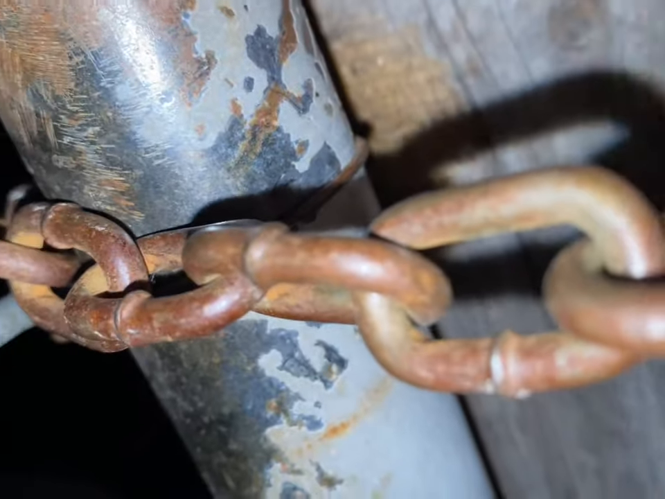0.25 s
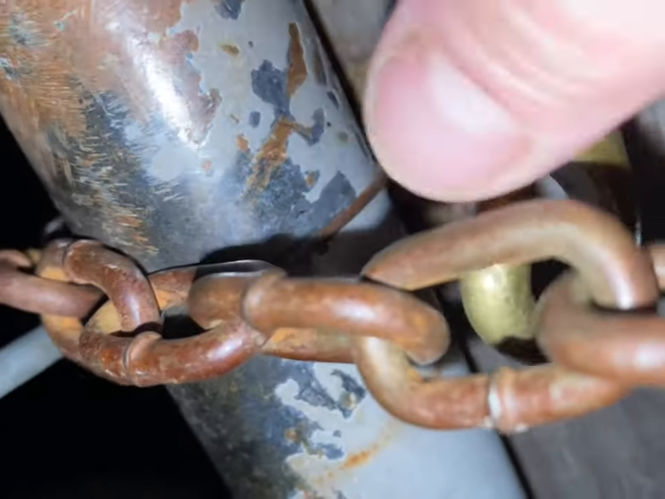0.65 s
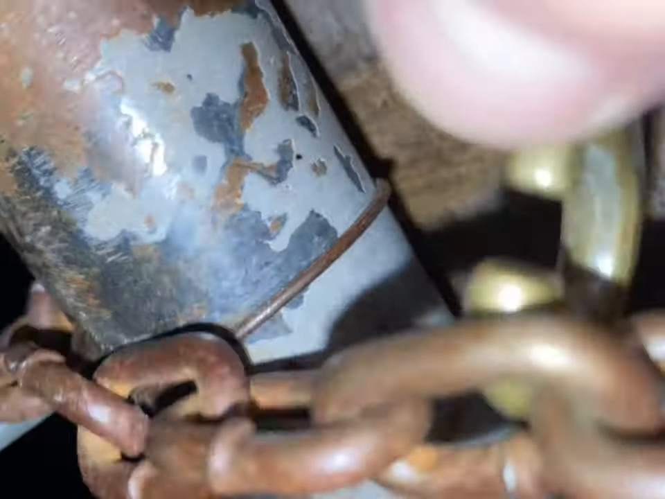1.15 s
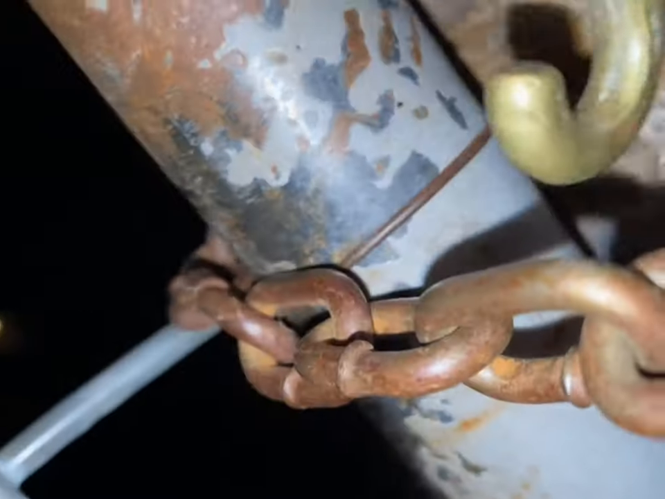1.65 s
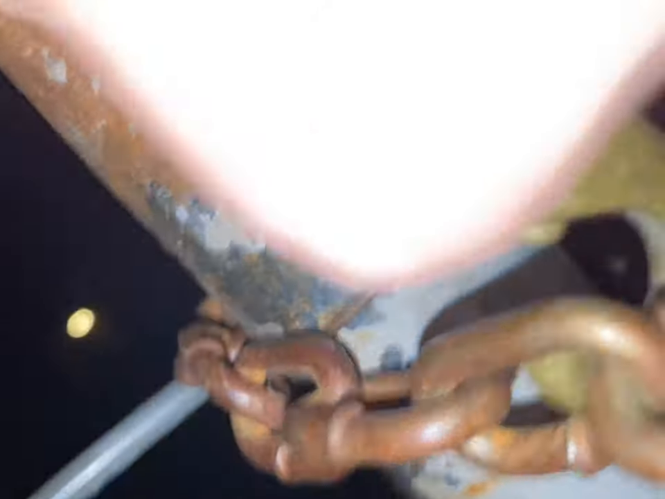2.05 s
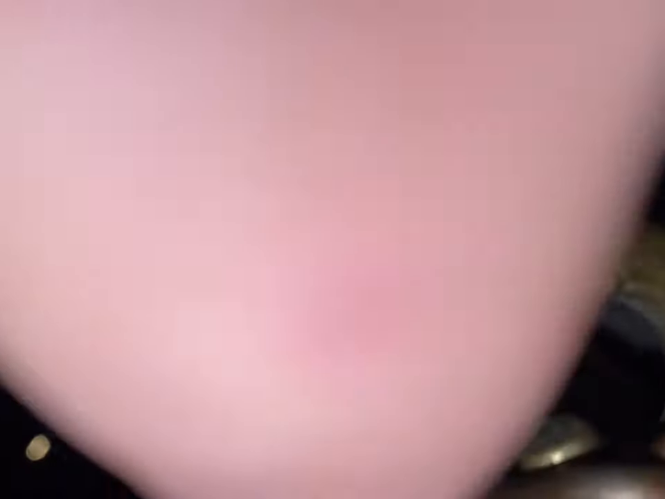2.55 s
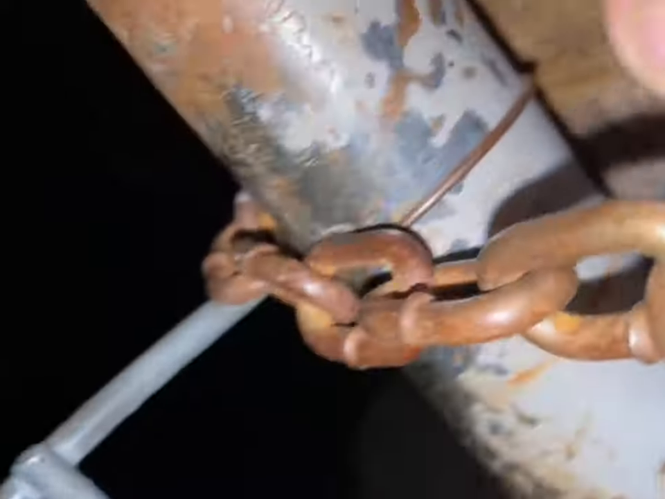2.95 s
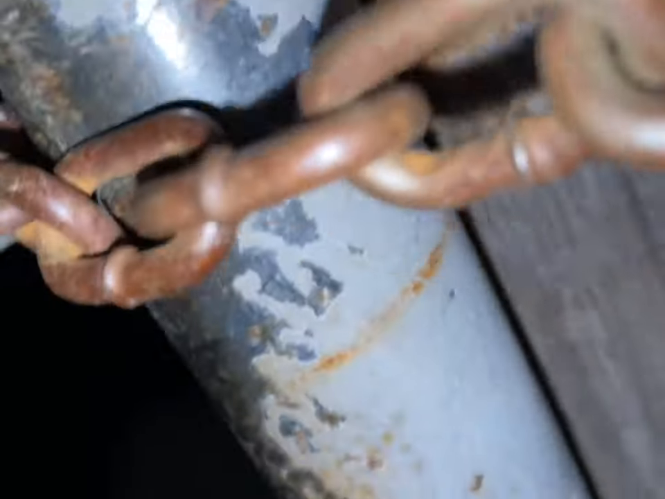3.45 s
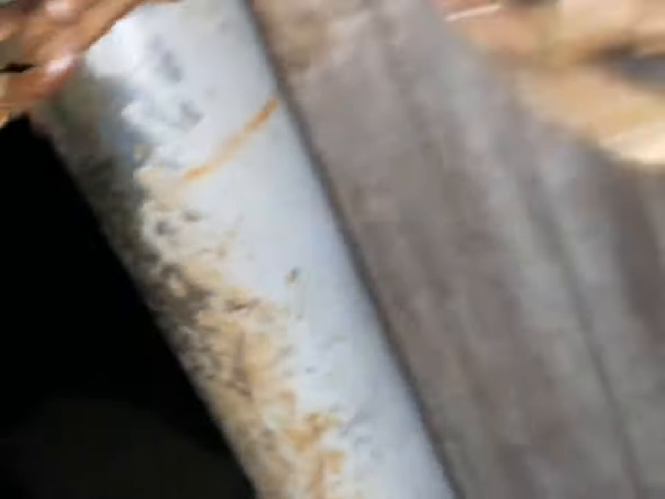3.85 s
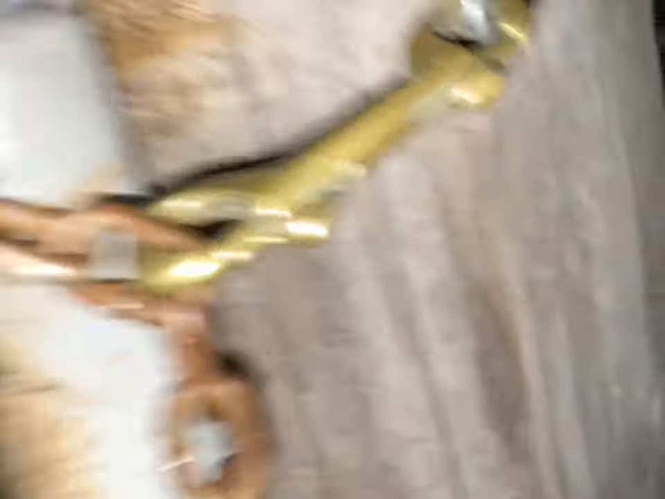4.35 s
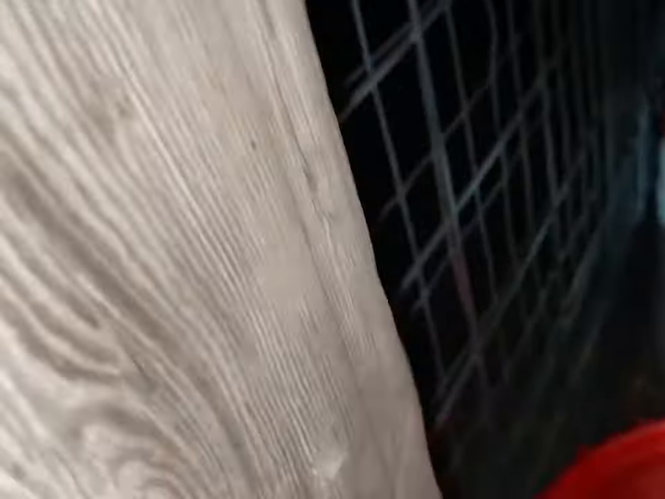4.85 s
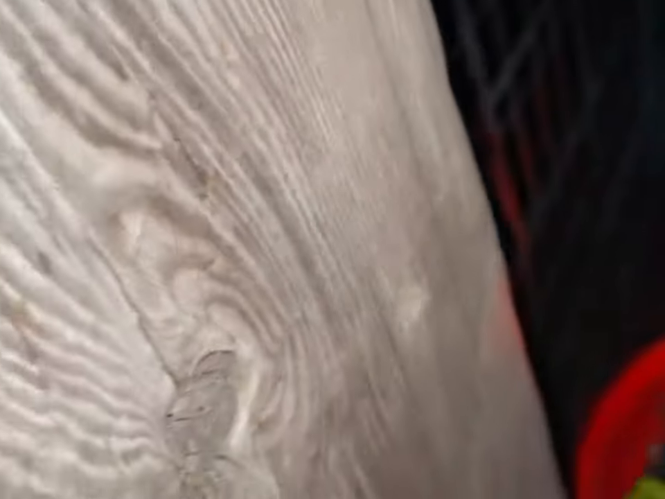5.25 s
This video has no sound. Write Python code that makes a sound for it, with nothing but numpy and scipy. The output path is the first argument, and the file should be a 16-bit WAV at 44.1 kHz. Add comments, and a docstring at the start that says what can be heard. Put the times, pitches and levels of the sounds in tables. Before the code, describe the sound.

A rusty chain clinks and rattles close by as a metal hook is fastened, then a wooden gate briefly scrapes and judders.

```python
"""Rusty chain links clink and drag as a hand works a sprung brass snap hook onto them, close to a phone.
Each impact excites the modes of the links and of the steel pipe post they are wrapped round; the hook's
spring squeaks by stick-slip friction. Then a plank gate scrapes and judders over grit, shaking its mesh.
Behind it a sleeve rustles, the hand rumbles on the phone and a far motor hums in the night air."""
import sys
import numpy as np
from scipy import signal
from scipy.fft import rfft, irfft
from scipy.io import wavfile
from scipy.ndimage import uniform_filter1d

SR = 44100
rng = np.random.default_rng(int(sys.argv[2]) if len(sys.argv) > 2 else 0)


def unload_audio(sound):
    """Save the sound as a 16-bit wav file, at the path given as the first command line argument."""
    columns = np.transpose(np.atleast_2d(sound))
    # keep every value between -1 and 1, then stretch to whole-number steps
    steps = np.round(np.clip(columns, -1, 1) * 32767)
    wavfile.write(sys.argv[1], SR, steps.astype(np.int16))


N = 243035
T = np.arange(N) / SR

# impacts of links and hook: (time [s], tick level [dB], body [dB re tick], post ring [dB re tick],
# thud [dB re tick], body pitch [Hz])
CLINKS = [(0.0167, -68.5, 6, -28, 10, 3960), (.04, -72, 5, -30, -8, 4500), (0.061, -61.5, 5, -20, -6, 3000),
          (.097, -72, 9, -30, -5, 3000), (.222, -78, 8, -30, 3, 4000), (0.268, -42, -12, -34, -40, 2860),
          (.35, -76, 6, -30, 5, 2200), (0.375, -56, -7.5, -21, -26, 2900),
          (0.5126, -71, 20, -18, -10, 3320), (0.5275, -51, -5, -15, -27, 4120),
          (.5444, -55, -2, -26, -26, 4670), (0.5745, -60, 4.5, -30, -25, 3000),
          (0.7158, -40.5, -12.5, -32, -28, 3950), (0.7303, -44.5, -11, -30, -20, 3880),
          (.7505, -56.5, -0.5, -24, -25, 4650), (.8, -70, 6, -30, -15, 4500),
          (0.8606, -52, -12, -33, -27, 4000), (.92, -72, 5, -30, -15, 4600),
          (.945, -48.5, -1, -41, -13, 4080), (1.005, -30, -13, -34, -21.5, 4030),
          (1.0982, -25.5, -16, -31, -25, 3750), (1.1476, -29, -8.5, -26, -46, 4770),
          (1.261, -42.5, 4, 4.5, -2, 3600), (1.2708, -49, -8, -2, -6, 2020),
          (1.2809, -47, -4, 5, -19, 1770), (1.3635, -57, -12, -17, -3, 1940),
          (1.3761, -49.5, -3.5, -28, -19, 3600), (1.396, -68, 9, -30, -15, 4200),
          (1.51, -50, -2, -34, -21, 2920), (1.526, -60, 5, -30, -15, 3100),
          (1.621, -62, -3, -30, -15, 3500), (2.022, -61, 1, -36, 11, 1750),
          (2.0373, -43, -8.5, -30, -19, 3980), (2.0648, -28, -16, -47, -33, 2660),
          (2.2211, -37, -7, -19, -36, 2580), (2.241, -40, -7, -35, -12, 2600),
          (2.2556, -53.5, -23, -14, 7.5, 1910), (2.309, -68.5, -1, 0, 17, 1560),
          (2.345, -70, -3, -20, 9, 1500), (2.41, -72, 3, -20, 11, 1500), (2.59, -66, -9, -30, -25, 4000),
          (2.7126, -66.5, -1, -7, 11, 1920), (2.7332, -71.5, 12.5, 5.5, 12.5, 2370),
          (2.7915, -63, -12, -35, -30, 3000), (2.811, -64, -15, -35, -30, 3000),
          (2.828, -66, -15, -35, -30, 3000), (2.9794, -27, -18, -49, -49, 2250),
          (3.0158, -55, 2, -10, -26, 2570), (3.0359, -25, -14, -29, -39, 2220),
          (3.111, -59, -8, -30, -30, 4000), (3.121, -26.5, -7, -24, -31, 2930),
          (3.1614, -25.5, -11, -36, -38, 3510), (3.1676, -34.5, -1.5, -24, -13.5, 2140),
          (3.291, -45.5, -10, -15, -32, 3700), (3.339, -47, -10, -36, -31, 2200),
          (3.4257, -44, -2, -12, -10, 2990), (3.5774, -43.5, -5, -10, -29.5, 5340),
          (3.5947, -69.5, 15, 8, 7, 3630), (3.703, -68, 2, -15, -5, 3000), (3.7944, -48, -9, -4, -27, 3470),
          (3.8279, -28, -23, -29, -50, 3400), (3.837, -56, 8, -30, -12, 2300),
          (3.8477, -35, -16, -39.5, -37, 3930), (3.8565, -31, -12, -22, -35, 3180),
          (3.888, -29.5, -10, -2.5, -27, 2940), (3.8971, -28, -12, 3, -38, 3200),
          (3.9043, -33, -16, 4, -26, 3830), (3.914, -40, -12, 11, -25, 3300),
          (3.9663, -31, -5, -16, -36, 3450), (3.9755, -20, -20, 2.5, -40.5, 3520),
          (3.9929, -25, -20, 5.5, -13, 3700), (3.996, -34, -5.5, 8, -20, 1490),
          (4.0022, -31.5, -14, 12, -15, 3060), (4.0294, -37, -14, 8, -25, 1400),
          (4.1393, -62, -21, 13.5, 1, 2560), (4.2615, -60, 8, 18, 3, 2600), (4.425, -74, 8, -20, 10, 2000),
          (4.4399, -72, 13, -9, 18, 2520), (4.904, -68, 7, -30, -15, 4700), (4.9364, -62, 14, -7, 3, 2170)]
# bright modes of a rusty link: (frequency [Hz], level [dB], t60 [s])
LINK_MODES = [(6800, -4.5, 0.0067), (10220, -8.5, 0.03), (10220, 20, 0.007), (13500, -20, .008),
              (14800, -7, .008)]
# the chain runs through the hook: (peak time [s], level [dB], 60 dB rise [s], t60 [s])
CHAIN_RUNS = [(1.152, -47.5, .01, .3), (1.27, -56, 0.19, 0.27), (3.166, -49, .018, 0.076),
              (3.863, -49, 0.0735, .4), (3.915, -43, 0.24, 0.052), (3.972, -41, .1, .2),
              (4.0, -35, 0.1137, .055)]
# rattle of the running chain: (frequency [Hz], spectral level [dB])
RUN_SPECTRUM = [(200, -25), (700, -29), (1300, -14), (2000, -14), (3400, -6.5), (5000, -8), (7000, -1),
                (11000, -3), (12500, -11), (14800, -15), (16500, -38.5)]
# sustained contact: (time [s], sleeve rustle [dB], chain drag [dB], hand rumble [dB])
CONTACT_LEVELS = [(0, -90, -80, -72), (.48, -92, -86, -68.5), (.85, -99, -87, -71), (1.05, -82, -74, -70),
                  (1.17, -64, -70, -74), (1.28, -69, -64, -68), (1.37, -86, -65, -63),
                  (1.57, -83, -78, -65.5), (2.0, -101, -86.5, -68), (2.09, -84, -76.5, -70.5),
                  (2.38, -79, -76, -62.5), (2.75, -102, -82.5, -64), (3.0, -79, -84.5, -65.5),
                  (3.19, -65, -63.5, -62), (3.34, -74.5, -73, -72.5), (3.55, -96, -75, -80),
                  (3.84, -73, -77, -77), (3.92, -85, -73, -82), (4.22, -97, -65, -86),
                  (4.73, -95.5, -82, -70.5), (4.86, -72.5, -73.5, -70), (5.02, -78, -67.5, -82),
                  (5.13, -101, -88, -64)]
# rust sliding on steel: (frequency [Hz], spectral level [dB])
DRAG_SPECTRUM = [(290, -34.5), (500, 1.5), (763, -8), (851, 0), (1720, -1), (2720, -0.5), (3300, -0.5),
                 (5420, -4.5), (9000, -15.5), (11700, -32.5), (19800, -120)]
# pulls on the spring: (start [s], end [s], slips [count], first level [dB], last level [dB],
# first pitch [Hz], last pitch [Hz])
SPRING_PULLS = [(1.6473, 1.676, 2, -50, -44, 9100, 9550), (2.8524, 2.9524, 9, -65, -71, 8450, 9550)]
# partials of the coil: (frequency [multiple of the pitch], level [dB])
SPRING_MODES = [(1, 7), (1.27, -9), (1.5, -1.5)]
# modes of the pipe: (frequency [Hz], gain when struck [dB], t60 [s], gain when rubbed [dB])
POST_MODES = [(850, -42, .04, 6), (1255, -32, .05, 3), (1310, -29.5, .07, 7), (2140, -38, .09, 8),
              (2550, -38, .07, 6), (3270, -34, .07, 7), (3550, -32, .08, 8), (3830, -32, .08, 6),
              (4320, -32, .09, 6), (5760, -12, .08, 10), (5820, -6.5, .18, 19), (5950, -13, .1, 12),
              (6160, -11, .08, 12), (6235, -14, .07, 8), (6300, -12, .043, 6), (6751, -32.5, .1, 5),
              (7020, -27, .1, 6), (10000, -29, .1, 4)]
# the chain settles on the post and mutes it: (start [s], ramp [s], release [s], gain [dB])
POST_MUTES = [(3.93, .04, 3.972, -7), (4.02, .02, 4.13, -4)]
# blows on the gate and post footing: (time [s], level [dB], depth of tone [0-1])
KNOCKS = [(0.956, -52.5, 0.81), (.975, -64, 0.45), (3.872, -55, .95), (3.89, -55, .95), (3.915, -55, .92),
          (3.958, -54, .95), (3.995, -49, 0.55), (5.118, -50, 0.33), (5.139, -27.5, 0.41),
          (5.176, -30, 0.44), (5.203, -29.5, 0), (5.296, -34, 0.64), (5.308, -29.5, 0.88),
          (5.328, -32.5, 0.74), (5.347, -38, .75)]
# modes of the planks: (frequency [Hz], level [dB], t60 [s], depth of tone that excites it best [0-1])
PLANK_MODES = [(165, 5.5, 0.072, 0.94), (218, -3.5, 0.23, 0.52), (280, -0.5, 0.14, 0.8),
               (328, -7, 0.066, 0.94), (422.5, 4.5, 0.26, 0.4), (578, -4, 0.051, 0.5),
               (635, -4.5, 0.051, 0.6), (753, 1.5, 0.14, 0.06), (875, -1.5, 0.07, 0.2)]
# the ground grips the planks and mutes them: (start [s], ramp [s], release [s], gain [dB])
PLANK_MUTES = [(.99, .03, 1.5, -25), (3.93, .02, 3.955, -15), (4.005, .03, 4.6, -29.5),
               (5.2, 0.033, 5.293, -12.5), (5.36, .1, 5.4, -21)]
# shoves that drag the gate: (time [s], jolt level [dB], scrape level [dB], scrape t60 [s])
SHOVES = [(4.939, -65, -56, 1), (5.145, -45, -51, 1), (5.3, -46, -65, 0.28)]
# dull scrape of the gate: (frequency [Hz], spectral level [dB])
SCRAPE_SPECTRUM = [(500, -10.5), (900, -1.5), (1600, -1.5), (2200, -2.5), (3200, -12.5), (5000, -19),
                   (9000, -49)]
# grit crushed under the gate: (peak time [s], level [dB], 60 dB rise [s], t60 [s])
GRINDS = [(4.96, -63, .1, .5), (5.119, -58, .01, .8), (5.143, -41, .012, .4), (5.195, -34.5, .2, .32),
          (5.318, -39, .025, .24)]
# grinding grit: (frequency [Hz], spectral level [dB])
GRIT_SPECTRUM = [(530, -8.5), (900, -10.5), (1880, -30), (2300, -16), (2880, -9), (5120, -10.5), (5580, -6),
                 (7040, -12), (9920, -9), (11500, -6), (11900, -48), (12800, -9.5), (14500, -15),
                 (16800, -64)]
# modes of the gate's wire mesh: (frequency [Hz], nominal width [Hz], level [dB])
MESH_MODES = [(2267, 22, 2), (2960, 40, -3), (3530, 50, -4), (2860, 50, -3), (4680, 50, -5), (5660, 60, -5),
              (10000, 110, -17)]
# the gate comes to rest and its scraping drops: (start [s], ramp [s], release [s], gain [dB])
GATE_HALTS = [(5.075, .025, 5.115, -6), (5.36, .06, 5.6, -18)]
# lone faint rings: (time [s], frequency [Hz], level [dB], t60 [s])
PINGS = [(.09, 568, -61.5, 0.12), (.375, 586, -63, 0.14), (.51, 592, -59.5, 0.094),
         (0.546, 4590, -67.5, 0.33), (.95, 2750, -66, .15), (2.91, 2580, -76, .1)]
# the sleeve brushes past: (time [s], level [dB])
BRUSHES = [(.1, -80), (.36, -78), (.51, -76), (.76, -76), (2.13, -76)]
# sliding cloth: (frequency [Hz], spectral level [dB])
RUSTLE_SPECTRUM = [(3500, -29.5), (6000, -11.5), (8200, -17), (9000, -1), (11200, -0.5), (12200, -15),
                   (13000, -4), (15000, -6), (16300, -41.5)]
# fingers bump the phone: (time [s], level [dB])
BUMPS = [(.87, -59), (.97, -53.5), (1.16, -58.5), (1.28, -54), (2.08, -56.5), (2.27, -54.5), (3.19, -54),
         (3.32, -59), (3.891, -57), (4.65, -61.5)]
# handling noise: (frequency [Hz], spectral level [dB])
RUMBLE_SPECTRUM = [(12, -61.5), (20, -21), (39, -5), (59, 4.5), (87, -4.5), (233, -15), (262, -19),
                   (358, -19.5), (700, -34), (910, -51), (1540, -120)]
# spectral lines of the motor: (frequency [Hz], level [dB])
HUM_LINES = [(58.5, -71), (117, -72), (234, -78.5), (290, -93.5), (357, -78), (409, -83.5)]
# the hum weakens as the phone turns away: (time [s], gain [dB])
HUM_FADE = [(0, -1.5), (3.35, -3.5), (3.5, -12), (4.1, -18), (4.6, -9), (5.51, -1.5)]
# night ambience: (frequency [Hz], spectral level [dB])
NIGHT_SPECTRUM = [(59, -30), (100, -8.5), (302, 0.5), (358, -0.5), (752, -15.5), (1010, -13), (4110, -27),
                  (7140, -43.5), (10200, -27), (15000, -36), (16000, -55)]
# the ambience dies away at the end: (start [s], ramp [s], release [s], gain [dB])
NIGHT_FADE = [(5.42, .07, 5.6, -12)]

TICK_RISE_S, TICK_T60_S, CLINK_PAN_DB = .0005, .013, 1.5  # pan is left minus right
BODY_T60_S, BODY_SPAN, NEIGHBOUR_DB = .016, 1.6, -7  # span is a frequency ratio each way
SLIP_RISE_S, SPRING_T60_S, SPRING_GLIDE_PER_S = .0009, .027, 1.7  # glide is a relative rise in pitch
SLIP_JITTER, SLIP_SCATTER_DB, SLIP_ROUGH_DB = .006, 3, 4
WAKE_DB, WAKE_SPAN_DB = -80, 16  # the drag starts to ring the post here, and does so fully a span higher
RUN_TO_POST_DB, CLINK_TO_WALL_DB, POST_FLUTTER_DB = -.5, -17, 3
PORT_LAG_SAMPLES, NOTCH_HZ, NOTCH_WIDTH_HZ, BASS_CUT_HZ, TOP_HZ = 11, 11800, 650, 44, 16800


def clinks():
    """Impact excitation: a broadband crack rings a link's modes, over a duller body and a thud."""
    size = 8192
    out, t = np.zeros((2, N + size)), np.arange(size) / SR
    peak = lambda x: x / np.abs(x).max()
    fall = lambda stretch: (1 - np.exp(-t / TICK_RISE_S)) ** 2 * undb(-60 * t / (stretch * TICK_T60_S))
    for s, db, body_db, _, thud_db, body_hz in CLINKS:
        crack = stereo_noise(.85, size) * fall(.42)
        crack[1] = np.roll(crack[1], PORT_LAG_SAMPLES)  # reaches the right port late
        link = sum(undb(mode_db + 4 * rng.standard_normal())
                   * ring(crack[0], hz * (1 + .044 * rng.standard_normal()), t60, 1.87)
                   for hz, mode_db, t60 in LINK_MODES)
        tail = band(stereo_noise(0, size) * fall(15), 5000, 16000)  # from rust and wood
        tick = peak(band(crack, 6300, 13500)) + undb(-.8) * peak(link) + undb(-36) * tail
        burst = stereo_noise(0, size) * (fall(2.2) + undb(-17) * fall(7.1))
        # neighbouring links answer at nearby pitches
        pitches_hz = body_hz * np.append(1, 1.25 ** rng.standard_normal(3))
        tones = sum(undb(NEIGHBOUR_DB * (k > 0)) * ring(crack[0], hz, BODY_T60_S, 1.9)
                    for k, hz in enumerate(pitches_hz))
        body = peak(band(burst, body_hz / BODY_SPAN, body_hz * BODY_SPAN)) + undb(4.5) * peak(tones)
        thud = peak(band(stereo_noise(.31, size) * fall(3), 190, 1200))
        i = int(s * SR)
        out[:, i:i + size] += undb(db) * (tick + undb(body_db) * body + undb(thud_db) * thud)
    return out[:, :N] * undb([[CLINK_PAN_DB / 2], [-CLINK_PAN_DB / 2]])


def chain_run():
    """Superposition: dense collisions merge into a rattle as the chain runs through the hook."""
    level = sum(surge(s, db, rise_s, t60) + surge(s, db - 22, rise_s, t60=.66)
                for s, db, rise_s, t60 in CHAIN_RUNS)
    return level * colour(stereo_noise(0) * grains(900, 2.1), RUN_SPECTRUM)


def chain_drag(level_db):
    """Sliding friction: rusty surfaces catch and slip, giving a grainy noise."""
    return undb(level_db + 2 * walk(30)) * colour(stereo_noise(-.068) * grains(440, 2.4), DRAG_SPECTRUM)


def spring():
    """Stick-slip: each of a row of even slips pings the coil, whose pitch climbs as it tightens."""
    size = 4096
    out, t = np.zeros((2, N + size)), np.arange(size) / SR
    slips = np.concatenate([np.linspace([s0, db0, hz0], [s1, db1, hz1], round(count))
                            for s0, s1, count, db0, db1, hz0, hz1 in SPRING_PULLS])
    onset = (1 - np.exp(-t / SLIP_RISE_S)) ** 2
    for s, db, hz in slips:
        pitch_hz = hz * (1 + SLIP_JITTER * rng.standard_normal())
        phase = 2 * np.pi * pitch_hz * (t + SPRING_GLIDE_PER_S * t ** 2 / 2)
        coil = sum(undb(mode_db) * stereo_sine(ratio * phase, 1.36 * ratio)
                   for ratio, mode_db in SPRING_MODES)
        coil *= undb(-60 * t / SPRING_T60_S)
        crack = undb(2) * band(stereo_noise(.26, size), 10000, 12800) * undb(-60 * t / .012)
        i = int(s * SR)
        out[:, i:i + size] += undb(db + SLIP_SCATTER_DB * rng.standard_normal()) * onset * (coil + crack)
    return out[:, :N] * undb(SLIP_ROUGH_DB * walk(500) - 2.5)


def post(rub):
    """Free and forced vibration: the pipe's clustered modes ring after blows and sing while rubbed."""
    s, db, _, ring_db = np.transpose(CLINKS)[:4]
    spread_db = 1.3 * rng.standard_normal((len(s), len(POST_MODES)))
    out = 0
    for k, (hz, mode_db, t60, rub_db) in enumerate(POST_MODES):
        blows = impulses(s, db + ring_db + mode_db + spread_db[:, k])
        rubbed = undb(rub_db) * 2 * np.log(1000) / (t60 * SR) * rub
        flutter = undb(POST_FLUTTER_DB * walk(140))  # loose links buzz against the wall
        out += flutter * ring(soft_contact(blows, hz, size=110) + rubbed, hz, t60, 1.32 * hz / 5800)
    return out * muting(POST_MUTES)


def pipe_wall(contact, count=60):
    """Modal response: the links excite many weak, short-lived modes of the pipe wall."""
    modes_hz = 1250 * (8000 / 1250) ** ((np.arange(count) + .7 * rng.random(count)) / count)
    leads = 2 * np.pi * rng.random(count)
    return undb(-50) * sum(ring(contact, hz, .13, lead) for hz, lead in zip(modes_hz, leads))


def gate():
    """Friction drives resonators: scraping rings the planks, and grinding grit shakes the mesh."""
    grit = colour(stereo_noise(0) * grains(700, 1.6) * undb(1.6 * walk(45)), GRIT_SPECTRUM)
    mesh = sum(undb(db + 4.5 * walk(30)) * ring(grit[0], hz, 4.1 / width, 1.68) * np.sqrt(width / SR)
               for hz, width, db in MESH_MODES)
    halts = muting(GATE_HALTS)
    scrape_level = halts * sum(surge(s, jolt_db, rise_s=.043, t60=.057) + surge(s, db, .03, t60)
                               for s, jolt_db, db, t60 in SHOVES)
    grit_level = halts * sum(surge(*row) for row in GRINDS)
    scrape = scrape_level * colour(stereo_noise(0) * grains(300, 2.4), SCRAPE_SPECTRUM)
    return planks(scrape_level) + grit_level * (grit + undb(-7.5) * mesh) + scrape


def planks(scrape_level):
    """Selective excitation: scraping and soft blows favour the modes nearest their own depth of tone."""
    s, db, blow_depth = np.transpose(KNOCKS)
    out = 0
    for hz, mode_db, t60, depth in PLANK_MODES:
        force = impulses(s, db + mode_db - 47.6 * np.abs(depth - blow_depth))
        force += undb(mode_db - 26 * np.abs(depth - .3) - 32.5) * scrape_level * rng.standard_normal(N)
        out += ring(soft_contact(force, hz, size=200), hz, t60, -hz / 500)
    return band(out, 110, 3000) * muting(PLANK_MUTES) * undb([[-1.7], [3.2]])


def pings():
    """Damped oscillation: lone faint tones start softly and decay exponentially."""
    out = 0
    for s, hz, db, t60 in PINGS:
        t = np.maximum(T - s, 0)
        out += undb(db - 60 * t / t60) * (1 - np.exp(-t / .003)) * stereo_sine(2 * np.pi * hz * t, 1.5)
    return out


def sleeve(level_db):
    """Cloth friction: tiny slips add up to a high rustle that swells at each brush."""
    level = undb(level_db) + sum(surge(s, db, rise_s=.25, t60=.25) for s, db in BRUSHES)
    return level * undb(2 * walk(25)) * colour(stereo_noise(.23) * grains(900, 1.7), RUSTLE_SPECTRUM)


def hand(level_db):
    """Structure-borne sound: the grip and finger bumps pass through the phone as a low rumble."""
    level = undb(level_db) + sum(surge(s, db, rise_s=.13, t60=.18) for s, db in BUMPS)
    return level * undb(1.8 * walk(25)) * colour(stereo_noise(.8), RUMBLE_SPECTRUM)


def motor():
    """Line spectrum: a far motor hums in tones that waver in level and pitch."""
    out = 0
    for hz, db in HUM_LINES:
        amplitude = np.sqrt(2) * undb(db + 3.7 * walk(13))
        phase = np.cumsum(2 * np.pi * hz * (1 + .014 * walk(6)) / SR)
        out += amplitude * stereo_sine(phase, hz / 400)
    return out * undb(curves(HUM_FADE)[0])


def night():
    """Diffuse field: faint ambient noise, almost uncorrelated between the two ports."""
    return muting(NIGHT_FADE) * undb(-75.5) * colour(stereo_noise(.1), NIGHT_SPECTRUM)


def ring(x, hz, t60, lead):
    """Damped resonator driven by x; the left port leads by lead radians."""
    z = signal.lfilter([1], [1, -np.exp(2j * np.pi * hz / SR - np.log(1000) / (t60 * SR))], x)
    return np.array([(z * np.exp(1j * lead)).imag, z.imag])


def soft_contact(force, hz, size):
    """Compliant contact: the mode at hz builds up over size samples."""
    push = np.hanning(size)
    return np.convolve(force, 2 * push / push.sum() * np.cos(2 * np.pi * hz * np.arange(size) / SR))[:N]


def impulses(times_s, db):
    """Ideal impacts, one sample each."""
    out = np.zeros(N)
    out[(times_s * SR).astype(int)] = undb(db)
    return out


def grains(rate, spread_db):
    """Shot-noise envelope: rate tiny slips a second over a steady floor, rms 1."""
    slips = (rng.random(N) < rate / SR) * undb(spread_db * np.minimum(rng.exponential(size=N), 4.5))
    envelope = 1 + signal.lfilter([1], [1, -.985], slips)
    return envelope / np.sqrt(np.mean(envelope ** 2))


def surge(s, db, rise_s, t60):
    """Exponential envelope: climbs 60 dB in rise_s to its peak at s, then falls 60 dB in t60."""
    return undb(db - 60 * np.where(T < s, (s - T) / rise_s, (T - s) / t60))


def muting(table):
    """Attenuation that ramps in and holds until its release."""
    return undb(sum(db * np.clip((T - s) / ramp_s, 0, 1) * (T < end) for s, ramp_s, end, db in table))


def walk(rate):
    """Random modulation: rate values a second joined by ramps, spread near 1."""
    hold = int(SR / rate)
    return 1.205 * uniform_filter1d(np.repeat(rng.standard_normal(N // hold + 1), hold), hold)[:N]


def stereo_noise(correlation, size=N):
    """Partially coherent white noise at the two microphone ports."""
    mid, side = rng.standard_normal((2, size))
    side = np.array([side, -side])
    return (np.sqrt(1 + correlation) * mid + np.sqrt(1 - correlation) * side) / np.sqrt(2)


def stereo_sine(phase, lead):
    """Phase difference: a sine whose left port leads by lead radians."""
    return np.sin(phase + np.array([[lead], [0]]))


def colour(x, spectrum):
    """Spectral shaping of x by (frequency [Hz], level [dB]) points, rms 1."""
    hz, db = np.transpose(spectrum)
    bins_hz = np.maximum(np.fft.rfftfreq(x.shape[-1], 1 / SR), 1)
    y = irfft(rfft(x) * undb(np.interp(np.log(bins_hz), np.log(hz), db)), x.shape[-1])
    return y / np.sqrt(np.mean(y ** 2))


def band(x, lo_hz, hi_hz):
    """Band-pass filter."""
    return signal.sosfilt(signal.butter(2, [lo_hz, hi_hz], "band", fs=SR, output="sos"), x)


def curves(table):
    """Linear interpolation of each column over time."""
    s, *columns = np.transpose(table)
    return [np.interp(T, s, column) for column in columns]


def undb(db):
    """Decibels to amplitude ratio."""
    return 10 ** (np.asarray(db) / 20)


def scene():
    """Coupling and superposition: the chain drives the pipe, and all sources add at the ports."""
    rustle_db, drag_db, rumble_db = curves(CONTACT_LEVELS)
    rustle = sleeve(rustle_db)
    drag = chain_drag(drag_db)
    rumble = hand(rumble_db)
    run = chain_run()
    ambience = night()
    hits = clinks()
    drag_coupling = np.clip((drag_db - WAKE_DB) / WAKE_SPAN_DB, 0, 1)
    rub = undb(RUN_TO_POST_DB) * run[0] + drag_coupling * drag[0]
    pipe = pipe_wall(run[0] + drag[0] + undb(CLINK_TO_WALL_DB) * hits[0]) + post(rub)
    return hits + run + drag + pipe + spring() + pings() + gate() + motor() + rustle + rumble + ambience


def record(dry):
    """Frequency response: the ports notch one treble band; the phone cuts the deepest bass and the top."""
    notched = dry - signal.lfilter(*signal.iirpeak(NOTCH_HZ, NOTCH_HZ / NOTCH_WIDTH_HZ, fs=SR), dry)
    thinned = signal.sosfilt(signal.butter(2, BASS_CUT_HZ, "high", fs=SR, output="sos"), notched)
    return signal.sosfilt(signal.ellip(10, .2, 80, TOP_HZ, fs=SR, output="sos"), thinned)


dry = scene()
out = record(dry)
unload_audio(out)
```